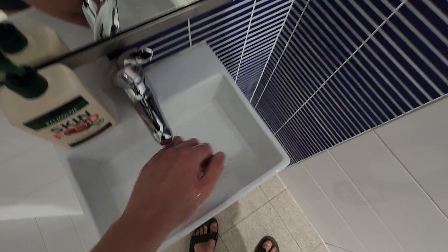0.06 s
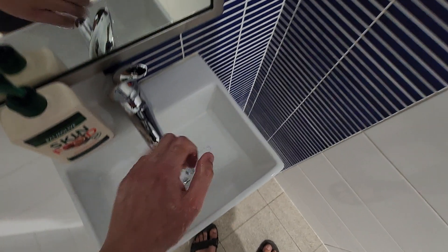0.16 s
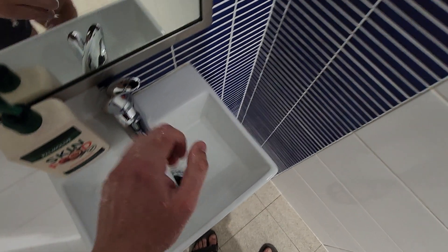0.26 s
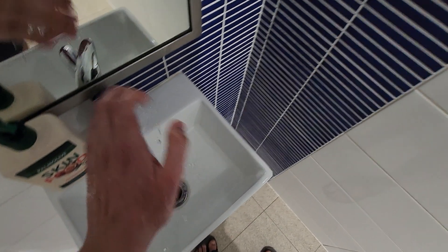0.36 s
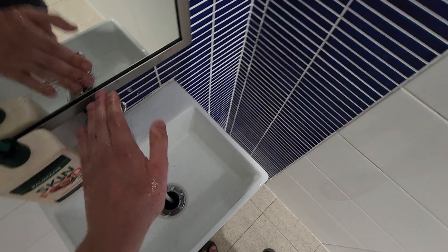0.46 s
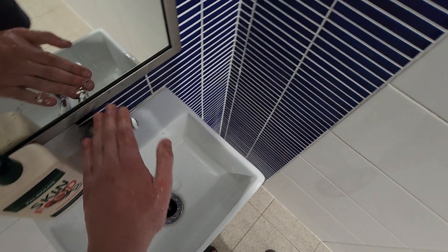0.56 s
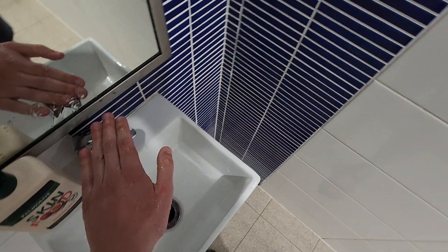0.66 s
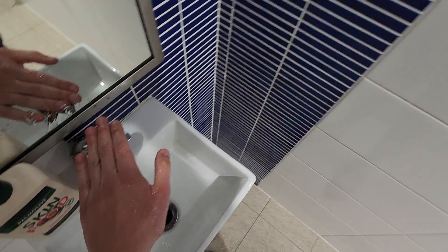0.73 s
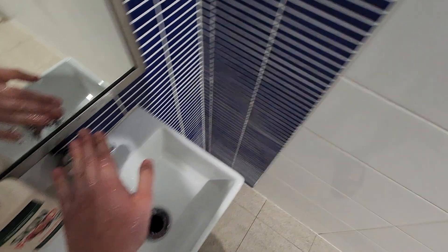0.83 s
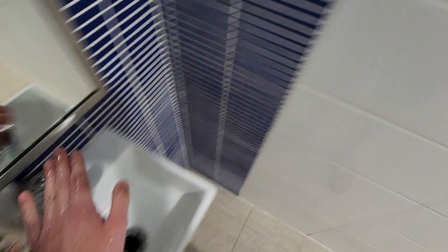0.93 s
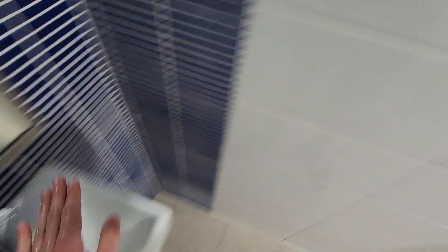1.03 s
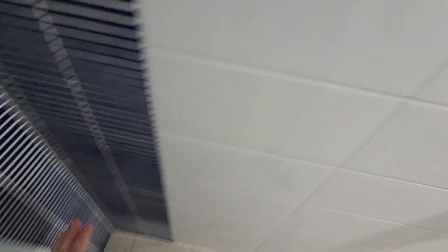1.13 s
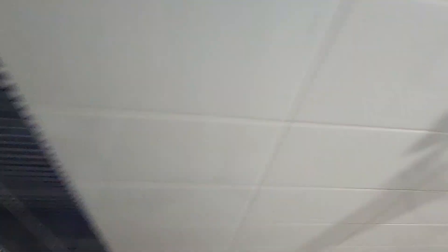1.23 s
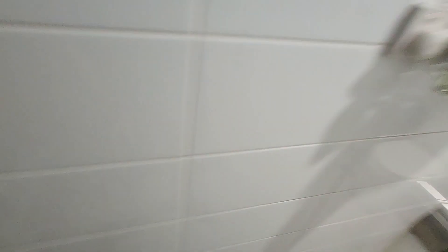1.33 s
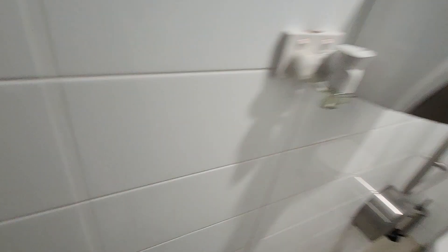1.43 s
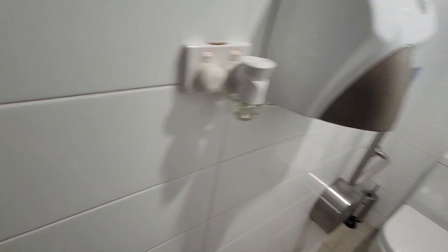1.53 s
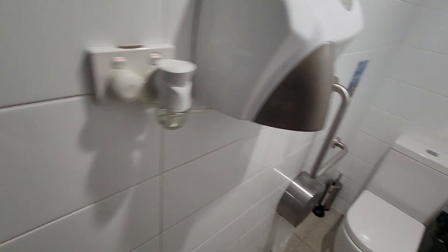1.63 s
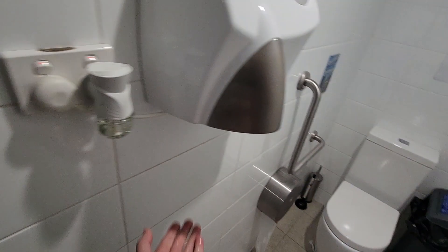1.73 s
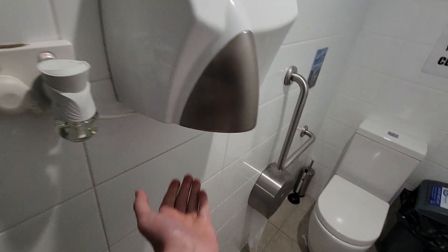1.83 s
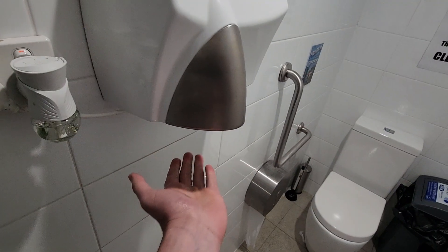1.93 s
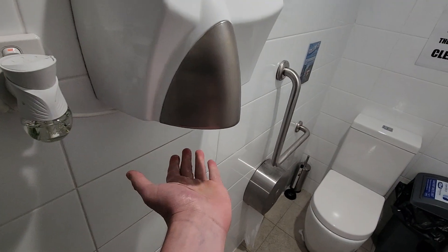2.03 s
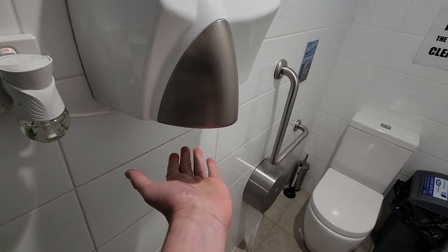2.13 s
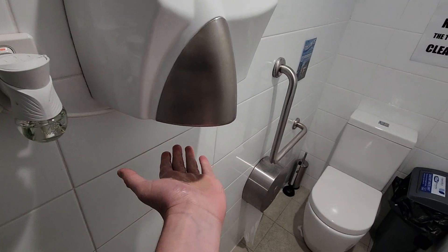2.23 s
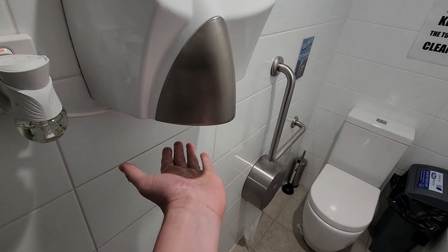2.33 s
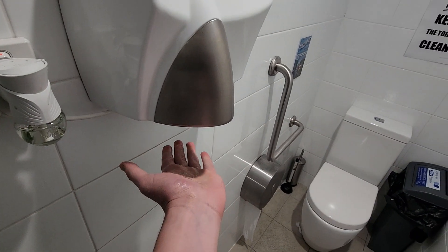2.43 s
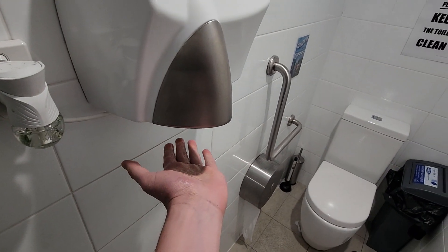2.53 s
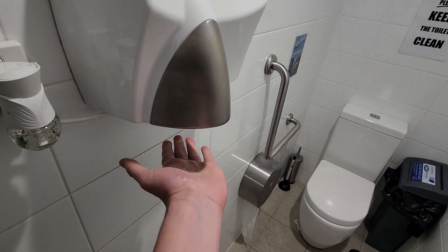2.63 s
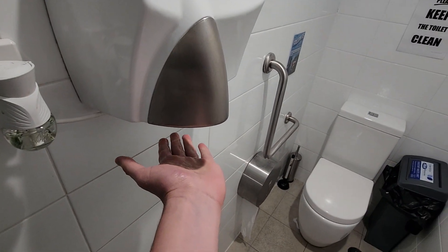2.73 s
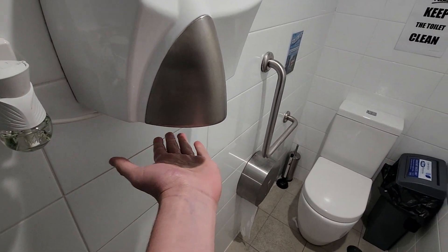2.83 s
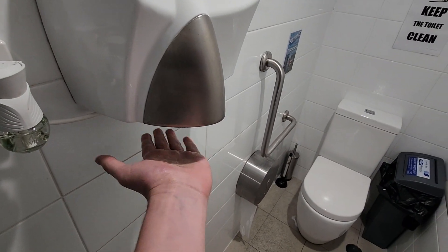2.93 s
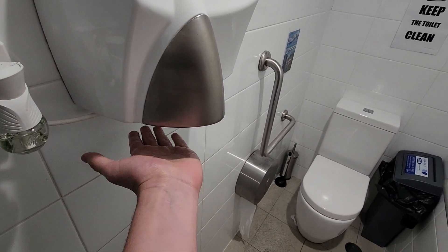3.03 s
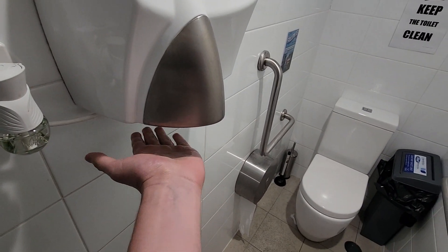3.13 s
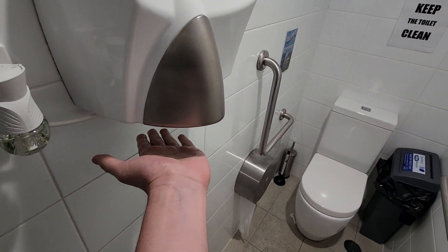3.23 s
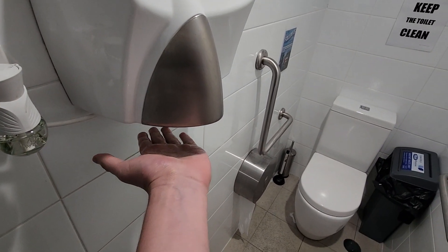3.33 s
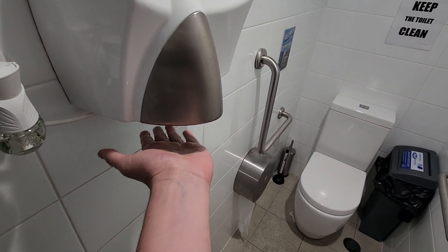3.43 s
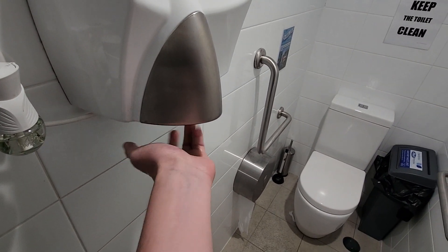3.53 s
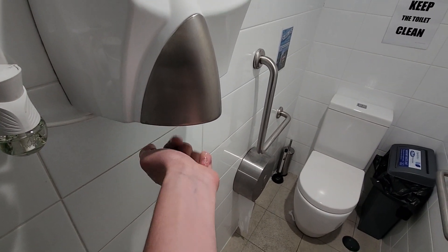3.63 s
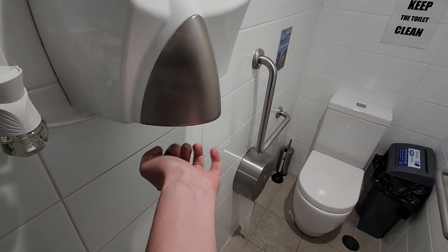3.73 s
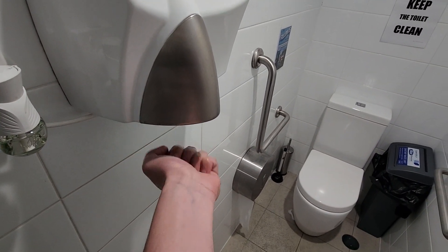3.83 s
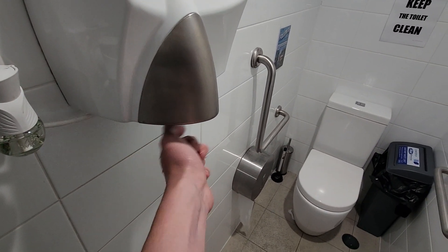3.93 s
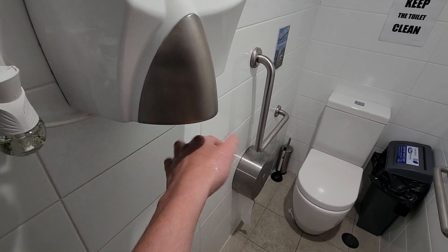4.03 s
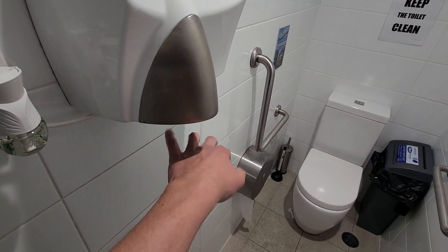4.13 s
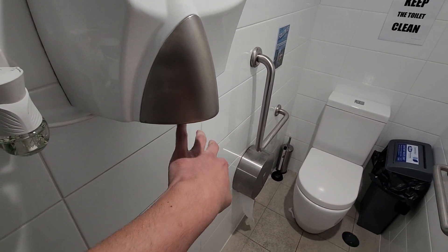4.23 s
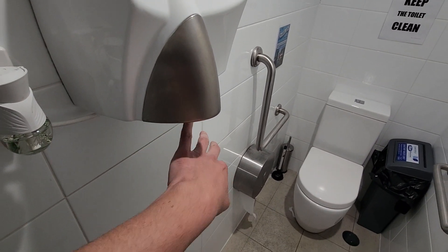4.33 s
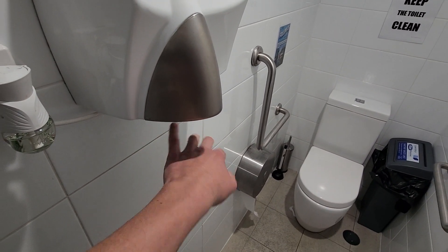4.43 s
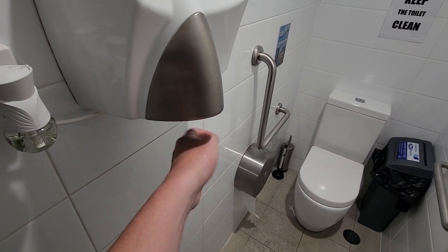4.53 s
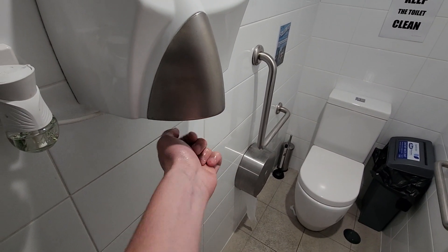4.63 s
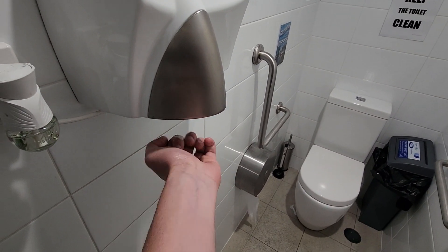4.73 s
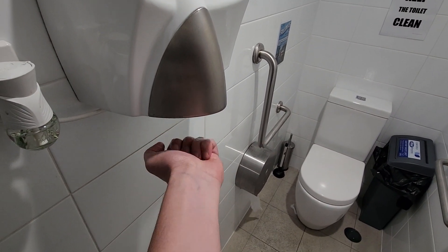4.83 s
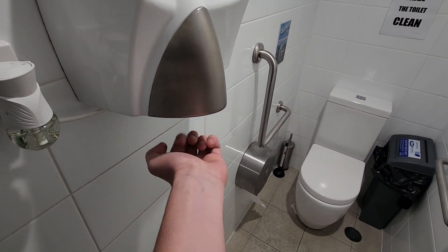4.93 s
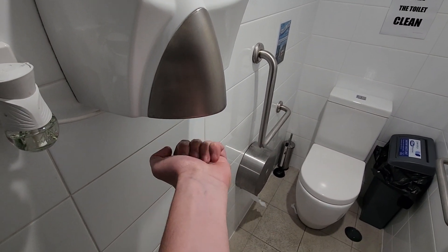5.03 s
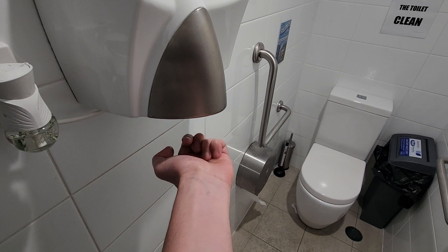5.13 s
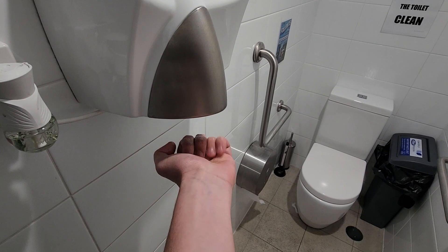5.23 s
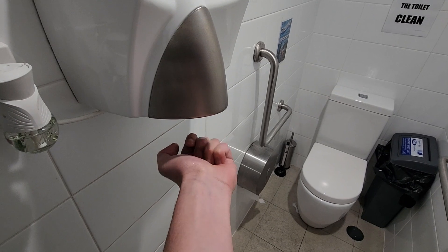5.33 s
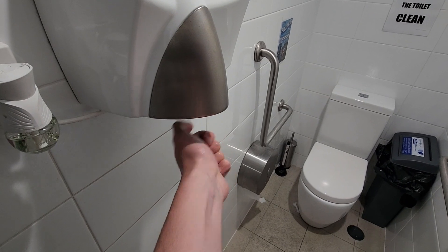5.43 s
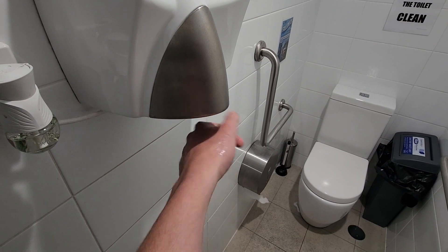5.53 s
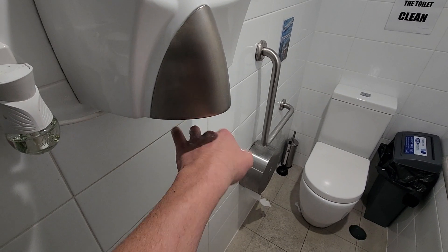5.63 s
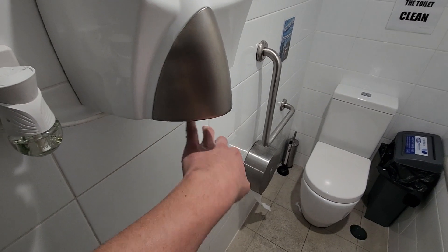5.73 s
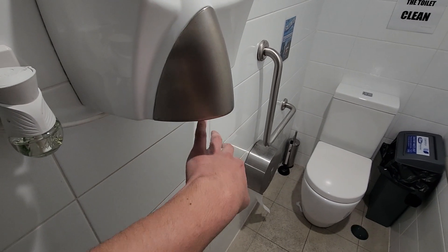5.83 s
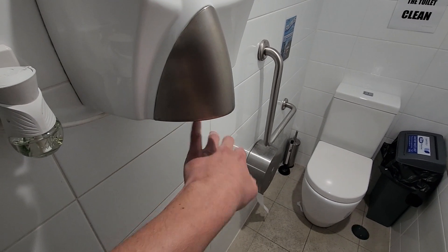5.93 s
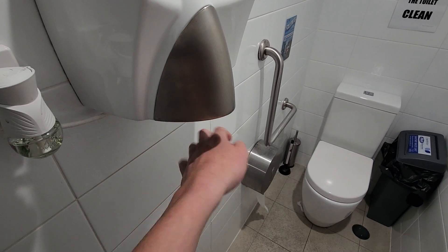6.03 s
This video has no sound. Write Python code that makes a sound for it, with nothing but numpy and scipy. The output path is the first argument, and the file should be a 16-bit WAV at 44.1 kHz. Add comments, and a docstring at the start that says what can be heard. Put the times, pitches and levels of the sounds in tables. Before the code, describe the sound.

Water gurgles briefly in a basin and soft footsteps follow, before a hand dryer snaps on with a loud, humming rush of air.

```python
"""A small tiled toilet room, heard from one spot through a microphone with two ports.
First a tap splashes and gurgles in the basin, the pipes knock, and the water dies as the tap is shut.
From 1 s sandals scuff and step over the floor among the last drips. Just after 3 s a relay snaps and
a hand dryer runs up to a loud rush of air over its motor tone, shifting as a hand turns in the jet.
Ventilation rumbles and hums underneath from start to end."""
import sys
import numpy as np
from scipy import signal
from scipy.fft import rfft, irfft
from scipy.io import wavfile
from scipy.ndimage import uniform_filter1d

SR = 44100
rng = np.random.default_rng(int(sys.argv[2]) if len(sys.argv) > 2 else 0)


def inscribe(sig):
    """Save sig as 16-bit PCM at rate SR to the path in sys.argv[1].

    A 1-D sig is mono; a 2-D sig holds one channel per row.
    Samples are clipped to [-1, 1] before scaling.
    """
    pcm = np.round(np.clip(np.atleast_2d(sig).T, -1, 1) * 32767)
    wavfile.write(sys.argv[1], SR, pcm.astype(np.int16))


N = 268128
TIME = np.arange(N) / SR
HZ = np.maximum(np.arange(N // 2 + 1) * SR / N, 1)

# Low roar of the fan through its housing: (frequency [Hz], relative level [dB])
ROAR_SPECTRUM = [(30, -40), (50, -12), (90, -16), (140, 0), (250, -5.5), (400, -7), (560, -9), (750, -10),
                 (1100, -15.5), (2500, -42)]
# Hollow rush in the nozzle: (frequency [Hz], relative level [dB])
RUSH_SPECTRUM = [(400, -14.5), (700, -3), (1000, -0.5), (1400, -2), (1900, -14), (3000, -26.5)]
# Hiss of the jet on the hand: (frequency [Hz], relative level [dB])
JET_SPECTRUM = [(700, -33), (1500, -5.5), (2200, 3), (3500, 0), (6000, -3.5), (9000, -6), (16000, -8)]
# Housing and room resonances: (frequency [Hz], width [Hz], lift [dB])
DRYER_MODES = [(75.4, 14, 4.5), (103, 13, 5.5), (112, 9.1, -6), (147, 14, 0), (160, 14, -4), (202.8, 20, 5),
               (251.2, 39, 10), (299, 28, 6), (343, 19, -3), (385, 32, 9.5), (427.3, 17, 6), (667, 30, 0),
               (696, 4.7, 3), (720, 37, 5), (777, 41, 2.5), (843, 7.7, 9), (885, 36, 5.5), (986, 12, 5),
               (1062, 34, 4.5), (1072, 45, 3), (1270, 12, -14), (1447, 25, 7.5), (1564, 23, 7),
               (1664, 35, 8.5), (2068, 6.9, 7), (2210, 9.2, 10.5), (2390, 270, 3.5)]
# A brief strained note during the run-up: (frequency [Hz], width [Hz], relative level [dB])
STRAIN_MODES = [(1600, 91, -2), (2200, 230, -8), (2520, 330, -6)]
# The hand cups and turns in the jet: (time [s], rush lift [dB], roar lift [dB])
HAND_MOVES = [(3.6, -0.5, -1), (4.2, 0, -0.5), (4.4, -1, 1), (4.65, 1, -1), (4.81, -1.5, 1.5),
              (5.1, 2.5, -2), (5.28, 0, 2), (5.5, -0.5, 0.5), (6.08, -0.5, 1.5)]


def hand_dryer(switch_s=3.155, fan_start_s=3.192, run_up_s=0.157):
    """The fan runs up like a charging capacitor; roar, rush and hiss each grow as a power of its speed."""
    speed = 1 - np.exp(-np.maximum(TIME - fan_start_s, 0) / run_up_s)   # share of full speed
    gust = drift(8)
    ripple = tile_ripple(spacing_hz=21.2)
    cupped_db, roar_lift_db, _ = in_time(HAND_MOVES)
    # the energised motor growls in the housing before the air moves
    growl = from_db(-33) * np.clip((TIME - switch_s) / 0.022, 0, 1)
    buffeting = from_db(roar_lift_db + 0.94 * drift(6.5))
    roar = np.hypot(growl, speed ** 2.34 * from_db(-17)) * buffeting
    roar = roar * room_noise(lifted(ROAR_SPECTRUM, DRYER_MODES), ripple=ripple)
    rush = speed ** 2.3 * from_db(-20 + cupped_db + 0.46 * gust + 0.61 * drift(3.5))
    rush = rush * room_noise(lifted(RUSH_SPECTRUM, DRYER_MODES), ripple=ripple)
    jet = speed ** 2.83 * from_db(-22 + 0.33 * gust)
    jet = jet * room_noise(lifted(JET_SPECTRUM, DRYER_MODES), ripple=ripple)
    strain_db = swells(3.31, rise=0.096, hold=0.25, level_db=-33.5, fall=0.38)
    strain = from_db(strain_db) * room_noise(resonant(STRAIN_MODES), ripple=ripple)
    return roar + rush + jet + strain + motor_tone(speed)


def motor_tone(speed, full_hz=138.9, mount_hz=127.6):
    """The dryer's shaft tone climbs with the fan and swells as it passes the mount's resonance."""
    shaft_hz = full_hz * speed
    mount_db = 9.5 * resonance(shaft_hz, mount_hz, width=12.5)
    return speed ** 4.2 * from_db(-28 + mount_db + 1.7 * drift(5.7)) * tone(shaft_hz, wander=0.97)


# Tap flow, heard as splash in the basin: (time [s], level [dB])
TAP_FLOW = [(0, -42.5), (.12, -37.5), (.3, -40), (.57, -42), (.66, -47), (.79, -43), (.89, -59), (.95, -70)]
# A hand cuts through the stream: (time [s], hold [s], splash level [dB], spray level [dB])
HAND_SPLASHES = [(0.065, .01, -33, -45), (.132, 0.072, -34, -34), (0.245, .005, -34, -29),
                 (0.792, 0.0063, -39, -50)]
# Broad splash: (frequency [Hz], relative level [dB])
SPLASH_SPECTRUM = [(1000, -11.5), (2000, -9), (3000, -4), (5000, -4.5), (8000, -6), (10000, -2.5),
                   (11500, -21)]
# Fine, high spray: (frequency [Hz], relative level [dB])
SPRAY_SPECTRUM = [(8500, -32), (10500, -0.5), (16000, 2)]
# Gulps of water in hollow spaces: (time [s], drain level [dB], spout level [dB])
GULPS = [(.1, -47, -55), (.158, -39.5, -60), (.304, -58, -49), (.398, -41, -38), (.508, -37, -41.5),
         (.595, -41, -50), (.625, -46, -42), (.68, -35, -43), (.735, -46, -39), (.77, -37.5, -44),
         (.82, -42, -49), (.855, -45, -57)]
# Resonances of the drain: (frequency [Hz], width [Hz], relative level [dB])
DRAIN_MODES = [(426, 33, 0), (498, 40, -7.5)]
# Resonances of the spout: (frequency [Hz], width [Hz], relative level [dB])
SPOUT_MODES = [(1233, 57, 2.5), (1385, 76, -10), (2060, 310, -14)]


def tap_water():
    """At the basin: grainy splash and spray, and turbulence ringing in drain and spout."""
    flow_db, flowing = in_time(TAP_FLOW)
    cut_s, hold, cut_splash_db, cut_spray_db = np.transpose(HAND_SPLASHES)
    splash_db = np.maximum(flow_db, swells(cut_s, 0.022, hold, cut_splash_db, fall=0.096))
    steady_spray_db = -35.5 + 1.5 * (flow_db - flow_db.max())   # spray fades faster than the flow
    spray_db = np.maximum(steady_spray_db, swells(cut_s, 0.022, hold, cut_spray_db, fall=0.096))
    gulp_s, gulp_drain_db, gulp_spout_db = np.transpose(GULPS)
    drain_db = gurgle_level(gulp_s, gulp_drain_db, burble_db=-50)
    spout_db = gurgle_level(gulp_s, gulp_spout_db, burble_db=-51)
    ripple = tile_ripple(spacing_hz=60)
    splash = from_db(splash_db) * room_noise(lifted(SPLASH_SPECTRUM), grain_db=2.0, ripple=ripple)
    spray = from_db(spray_db) * room_noise(lifted(SPRAY_SPECTRUM), grain_db=3.5)
    drain = from_db(drain_db + 1.4 * drift(25)) * room_noise(resonant(DRAIN_MODES))
    spout = from_db(spout_db + 2.2 * drift(25)) * room_noise(resonant(SPOUT_MODES))
    return flowing * (splash + spray + drain + spout)


def gurgle_level(gulp_s, gulp_db, burble_db):
    """Level in dB of short gulps over a steady burble while the tap is being shut."""
    gulps = swells(gulp_s, rise=0.08, hold=0.0093, level_db=gulp_db, fall=0.075)
    burble = swells(0.38, rise=0.08, hold=0.46, level_db=burble_db, fall=0.075)
    return np.maximum(gulps, burble)


# Drops on basin and floor, and last two soft, low footfalls: (time [s], level [dB], ring pitch [Hz])
DROPS_AND_FOOTFALLS = [(.0388, -38, 14400), (0.064, -23.5, 4020), (.0994, -35.5, 4100), (.140, -32, 507),
                       (.145, -43, 2300), (.174, -34, 5560), (.2039, -33, 15000), (0.226, -29.5, 8300),
                       (0.247, -28.5, 6270), (0.2985, -34.5, 2820), (.299, -39, 1990), (.3451, -40, 13600),
                       (0.38, -38.5, 3030), (.394, -37, 14200), (.4618, -35.5, 14500), (.5087, -39, 6050),
                       (.575, -36, 7840), (.576, -40.5, 2800), (.779, -45, 8000), (.8063, -37, 3340),
                       (.8063, -40, 7040), (.9906, -59, 13000), (1.013, -53, 3130), (1.038, -51, 12800),
                       (1.059, -52, 13800), (1.086, -54, 2930), (1.139, -54, 6820), (1.195, -48, 2080),
                       (1.481, -55, 5420), (1.575, -46, 450), (2.005, -33, 425)]


def drops_and_footfalls(tiles_t60_s=0.068, ring_cycles=30, tick_t60_s=0.025, length=4000):
    """Each impact is a puff of noise ringing round its pitch; the higher ones start with a broad tick."""
    out, t = np.zeros((2, N)), TIME[:length]
    puffs = rng.standard_normal((len(DROPS_AND_FOOTFALLS), 2, length))
    for (s, db, hz), puff in zip(DROPS_AND_FOOTFALLS, puffs):
        band = signal.butter(2, [hz * 0.93, min(hz * 1.09, 18000)], "band", fs=SR, output="sos")
        ring_t60_s = tiles_t60_s + ring_cycles / hz
        ring = from_db(-60 * t / ring_t60_s) * rms_one(signal.sosfilt(band, puff))
        tick = from_db(-2 - 60 * t / tick_t60_s) * np.diff(puff, prepend=0) * (hz > 1000)
        start = round(s * SR)
        out[:, start:start + length] += from_db(db) * (ring + tick)
    return out


# A latch-like tick, then the relay: (time [s], crack level [dB], tail level [dB], top-end lift [dB])
SNAPS = [(1.194, -31, -45.5, -18), (3.153, -47, -21.5, 1)]
# Bright colour of both snaps: (frequency [Hz], relative level [dB])
SNAP_SPECTRUM = [(800, -20), (2000, -2), (3500, -8), (5000, -3), (6200, 7.5), (7500, -1), (16000, 5)]


def snaps(top_end_hz=9500):
    """Sharp cracks, each with a tail thrown back by the tiles."""
    out = 0
    for s, crack_db, tail_db, top_db in SNAPS:
        colour = lifted(SNAP_SPECTRUM) * from_db(top_db * (HZ > top_end_hz))
        envelope = from_db(crack_db) * dying(s, t60=0.017) + from_db(tail_db) * dying(s, t60=0.3)
        out = out + envelope * room_noise(colour)
    return out


# Knocks in the pipes and on the dryer housing: (time [s], pitch [Hz], level [dB], 60 dB decay [s])
KNOCKS = [(0.089, 147, -25, 0.24), (0.149, 72, -21.5, 0.34), (.640, 74, -23, 0.23), (.810, 74.5, -28, 0.27),
          (1.93, 148.2, -28.5, 0.4), (3.175, 79, -18, 0.25)]


def knocks():
    """Soft low knocks that swell over a couple of cycles and die, alike at both ports."""
    out = 0
    for s, hz, db, t60 in KNOCKS:
        envelope = dying(s, t60) - dying(s, t60=0.035)
        out = out + from_db(db) * envelope * np.sin(2 * np.pi * hz * (TIME - s))
    return out


# A long faint shuffle, then scuffs: (time [s], rise, sign ignored [s per 20 dB], hold [s], level [dB])
SCUFFS = [(1.004, .1, 1.2, -59), (1.2, -0.9, .03, -54), (1.507, 0.7, 0.086, -55.5),
          (1.584, -0.03, .01, -44.5), (1.68, .035, 0.032, -42.5), (1.865, 0.17, 0.049, -46),
          (2.013, 0.1, 0.026, -43.5)]
# Friction of sole on floor: (frequency [Hz], relative level [dB])
SCUFF_SPECTRUM = [(500, 4.5), (1000, 2.5), (2200, 0), (5000, -3), (8000, -3.5), (16000, -13.5)]


def sandals():
    """Down at the floor, soles brush over grit on the tiles."""
    level_db = swells(*np.transpose(SCUFFS), fall=0.1)
    ripple = tile_ripple(spacing_hz=40)
    return from_db(level_db) * room_noise(lifted(SCUFF_SPECTRUM), grain_db=1.0, ripple=ripple)


# Rumble of the duct: (frequency [Hz], relative level [dB])
DUCT_SPECTRUM = [(20, -40), (34, -7.5), (60, -5.5), (110, -6.5), (217, -15), (368, -19.5), (552, -21.5),
                 (800, -29.5), (1500, -35), (4000, -48), (8000, -52), (10000, -64), (16000, -64)]
# The room's low modes: (frequency [Hz], width [Hz], lift [dB])
ROOM_MODES = [(66.5, 9.4, 5), (94.3, 11, 11.5), (118.5, 9.5, -7), (133, 23, 4), (146.3, 9.6, 8),
              (181, 11, -3), (215.5, 16.4, 11), (239, 14, 3), (431.7, 17, 12), (468, 14, -0.5),
              (910, 27, 6.5)]
# Ventilation tones where the microphone stands: (time [s], hum level [dB], whine level [dB])
VENT_LEVELS = [(0, -32.5, -68), (.3, -35.5, -58), (.85, -34, -52), (1.25, -38, -58.5), (1.6, -37, -50),
               (2.4, -40.5, -47), (3.14, -39.5, -46), (3.2, -40, -54), (6.08, -39.5, -58)]
# Faint thin tones of the ventilation: (frequency [Hz], level [dB])
THIN_TONES = [(3160, -74), (3429, -90), (4043, -78.5), (4570, -87), (4840, -75.5)]


def ventilation(hum_hz=44.8, whine_hz=705):
    """Room tone: duct rumble in the low modes, a wavering hum, a whine to the left and thin tones."""
    hum_db, whine_db, _ = in_time(VENT_LEVELS)
    rumble = from_db(-36 + 0.2 * drift(6.6)) * room_noise(lifted(DUCT_SPECTRUM, ROOM_MODES))
    hum = from_db(hum_db + 0.33 * drift(8.3)) * tone(hum_hz, wander=0.53)
    balance_db = np.array([[3], [-4]])
    whine = from_db(whine_db + balance_db) * tone(whine_hz, wander=0.093)
    thin = sum(from_db(db) * np.array([tone(hz, wander=0.4), tone(hz, wander=0.4)])
               for hz, db in THIN_TONES)
    return rumble + hum + whine + thin


# The room's sound field at the microphone:
# (frequency [Hz], left-right likeness [0-1], left phase lead [rad], ripple depth [dB])
ROOM_FIELD = [(40, 0.97, 0, -9), (133, 1, 0, 1.5), (198, 0.91, -0.9, 2.5), (305, 0.85, 0.97, 0.5),
              (425, 0.86, -0.86, 1.5), (596, 0.23, 2.5, 2), (712, 0.65, 0.3, 3), (923, 0.66, 1.74, 2.5),
              (987, 0.8, 2, 1.3), (1340, 0.34, 3, 1), (1610, 0.35, 3.5, 3), (2020, 0.02, 3, 4.5),
              (3980, 0.03, 0.5, 2.5), (9000, 0.01, -1, 1), (12000, 0, 3, 1)]


def room_noise(gain, grain_db=0, ripple=1):
    """Noise of rms 1 at the two ports: shared but out of step in the bass, unrelated in the treble."""
    white = rng.standard_normal((2, N)) * from_db(grain_db * drift(300))
    left, unrelated = rfft(white) * gain
    alike = np.clip(at_hz(ROOM_FIELD), 0, 1)
    lag = np.exp(-1j * at_hz(ROOM_FIELD, column=2))
    right = alike * left * lag + np.sqrt(1 - alike ** 2) * unrelated
    return rms_one(irfft(np.array([left, right]) * ripple, N))


def tile_ripple(spacing_hz):
    """The hard walls' crowded modes ripple the spectrum finely, differently at each port."""
    bins = max(round(spacing_hz * N / SR), 1)
    chance = rng.standard_normal((2, len(HZ)))
    smooth = uniform_filter1d(uniform_filter1d(chance, bins), bins)
    return from_db(at_hz(ROOM_FIELD, column=3) * 2 * np.tanh(rms_one(smooth) / 2))


def from_db(db):
    """Decibels to gain."""
    return 10 ** (np.asarray(db) / 20)


def rms_one(x):
    """Scale to rms 1."""
    return x / np.sqrt(np.mean(x ** 2) + 1e-20)


def in_time(rows):
    """Columns joined in time, and a gate that shuts outside the table's span."""
    s, *columns = np.transpose(rows)
    gate = np.interp(TIME, [s[0] - 0.03, s[0], s[-1], s[-1] + 0.05], [0, 1, 1, 0])
    return [np.interp(TIME, s, column) for column in columns] + [gate]


def at_hz(points, column=1):
    """A column read on the log frequency axis."""
    points = np.array(points)
    return np.interp(np.log(HZ), np.log(points[:, 0]), points[:, column])


def resonance(hz, centre, width):
    """Power shape of one resonance, 1 on top."""
    return 1 / (1 + (2 * (hz - centre) / width) ** 2)


def lifted(spectrum, modes=()):
    """Gain of a spectrum with any resonances standing out of it."""
    return from_db(at_hz(spectrum) + sum(db * resonance(HZ, hz, width) for hz, width, db in modes))


def resonant(modes):
    """Gain of noise heard only through its resonances."""
    return sum(from_db(db) * resonance(HZ, hz, width) for hz, width, db in modes)


def drift(rate_hz, step=40):
    """Smooth random wander of spread 1."""
    pole = np.exp(-2 * np.pi * step * rate_hz / SR)
    chance = rng.standard_normal(N // step + 2002)
    slow = signal.lfilter([1], [1, -2 * pole, pole * pole], chance)[2000:]
    return np.interp(np.arange(N) / step, np.arange(len(slow)), rms_one(slow))


def tone(hz, wander):
    """A sine of rms 1 whose phase strays by about `wander` radians."""
    phase = 2 * np.pi * np.cumsum(hz * np.ones(N)) / SR
    return np.sqrt(2) * np.sin(phase + wander * drift(3.8))


def dying(s, t60):
    """Envelope that jumps to 1 at time s and falls 60 dB in t60 seconds."""
    return (TIME >= s) * from_db(-60 * np.maximum(TIME - s, 0) / t60)


def swells(peak_s, rise, hold, level_db, fall):
    """Level in dB of events that rise, hold and fall (edges in s per 20 dB); the loudest wins."""
    t, out = np.arange(0, N + 32, 32) / SR, -200
    for s, rise_s, hold_s, db in np.broadcast(peak_s, rise, hold, level_db):
        outside = np.maximum((s - t) / abs(rise_s), (t - s - hold_s) / fall)
        out = np.maximum(out, db - 20 * np.maximum(outside, 0))
    return np.interp(TIME, t, out)


def scene():
    """All sources as they reach the microphone."""
    return (hand_dryer() + tap_water() + drops_and_footfalls() + snaps() + knocks()
            + sandals() + ventilation())


# Response of the microphone's two ports: (frequency [Hz], left gain [dB], right gain [dB])
PORT_RESPONSE = [(100, 0, 0.5), (1300, 0, -0.5), (2440, -2.5, 0), (5070, -1, 3.5), (6650, 1.5, 4.5),
                 (8020, 6.5, -4.5), (9030, -3.5, -27), (9300, -11, -18), (10630, -7, -19),
                 (11560, -3, -6.5), (13850, 7, -8.5), (16000, -3, -2)]


def record(dry, stopband_hz=16250):
    """Each microphone port colours the treble its own way; the very top is cut."""
    colour = from_db([at_hz(PORT_RESPONSE, column=1), at_hz(PORT_RESPONSE, column=2)])
    coloured = irfft(rfft(dry) * colour, N)
    lowpass = signal.cheby2(16, 60, stopband_hz, fs=SR, output="sos")
    return signal.sosfilt(lowpass, coloured)


dry = scene()
out = record(dry)
inscribe(out)
```